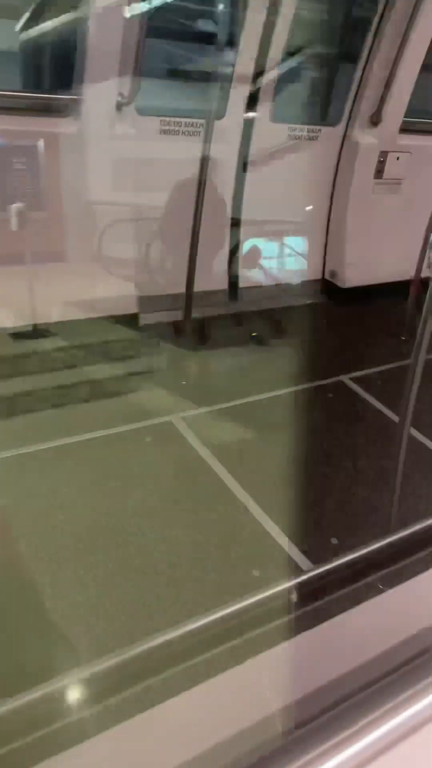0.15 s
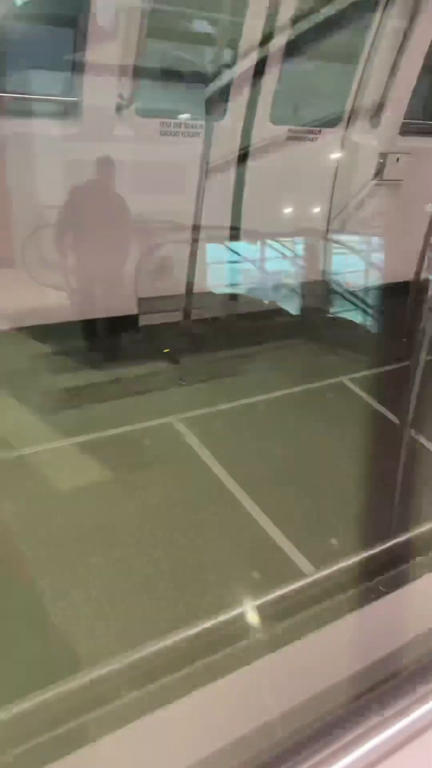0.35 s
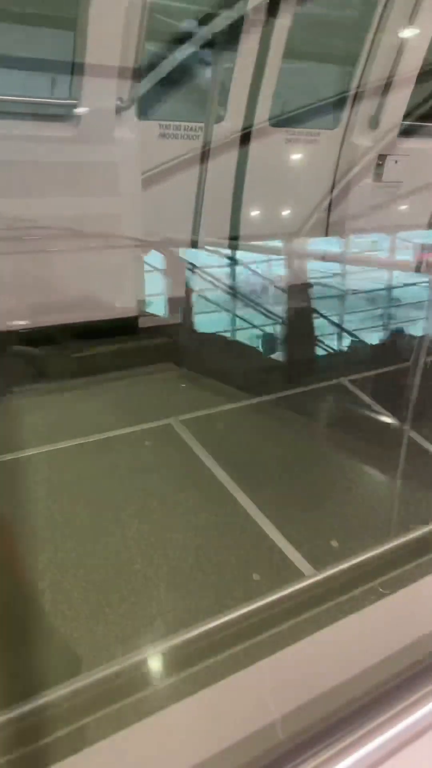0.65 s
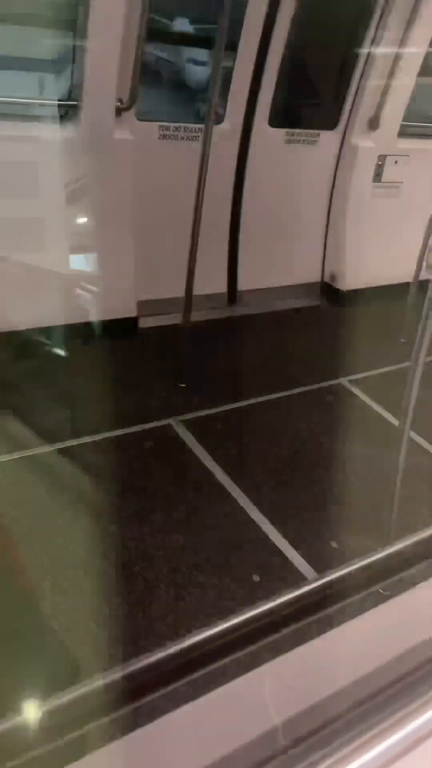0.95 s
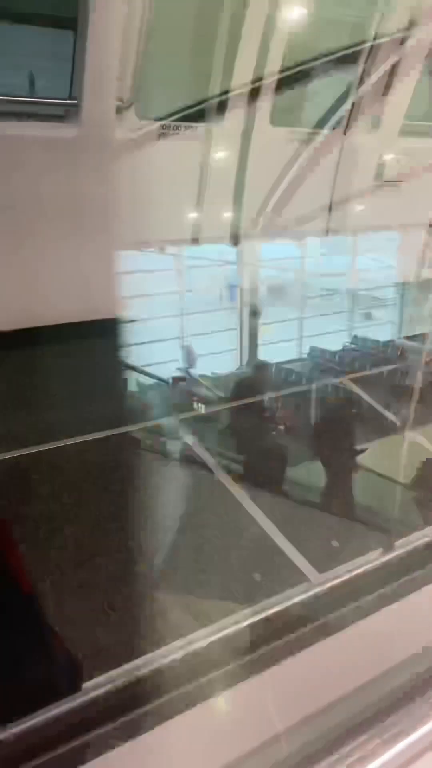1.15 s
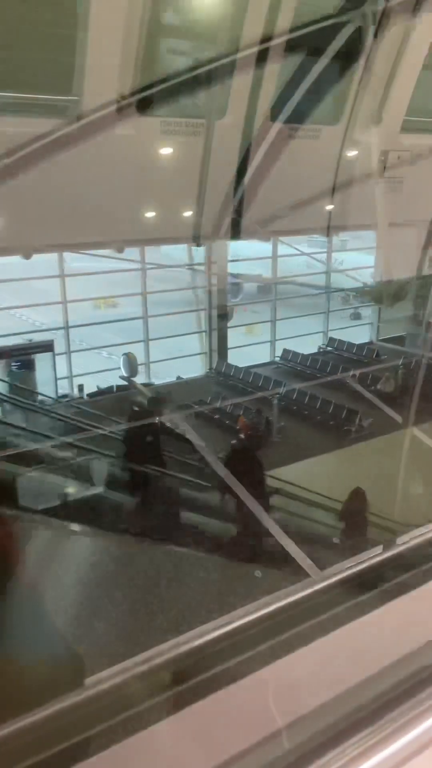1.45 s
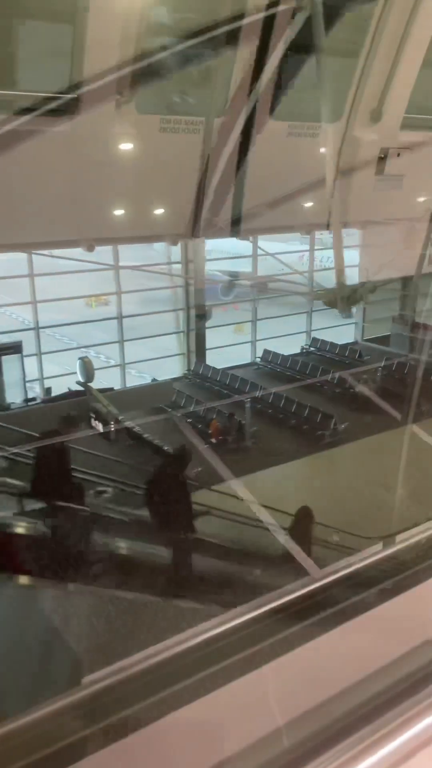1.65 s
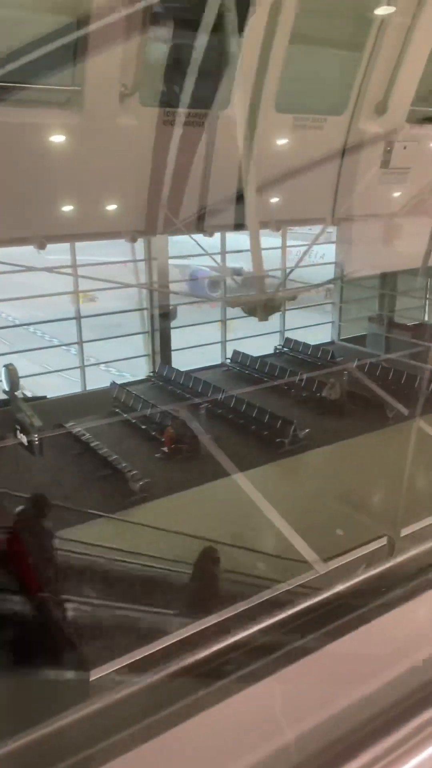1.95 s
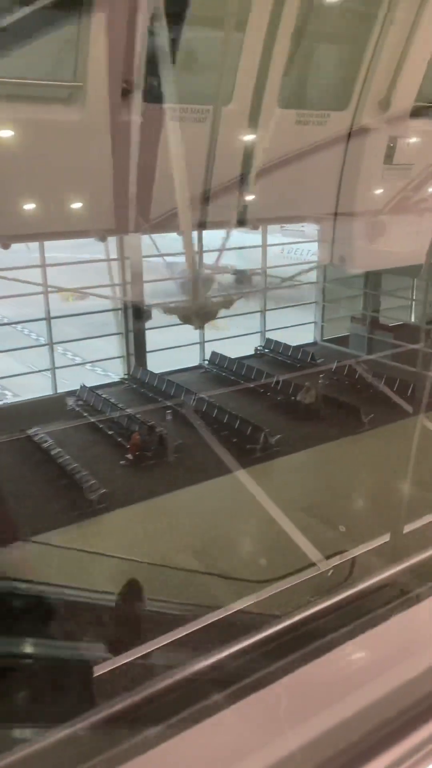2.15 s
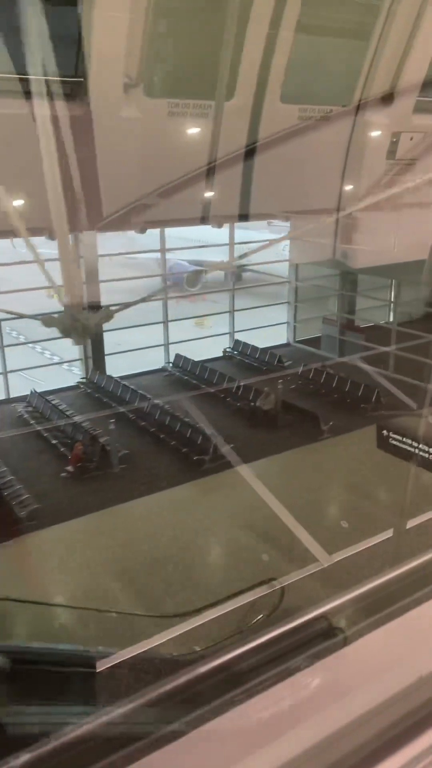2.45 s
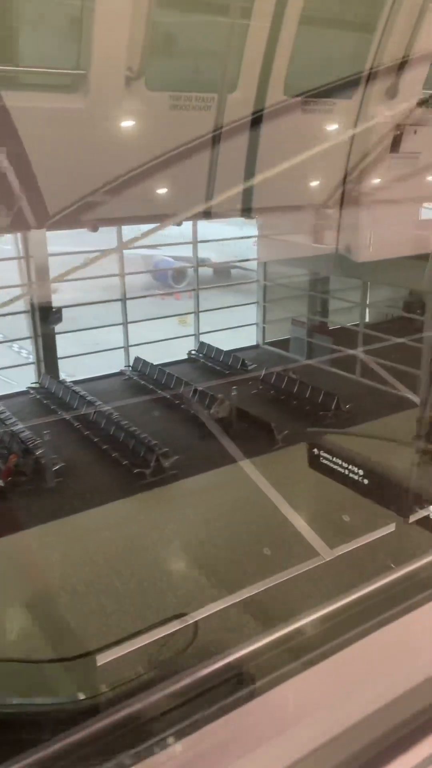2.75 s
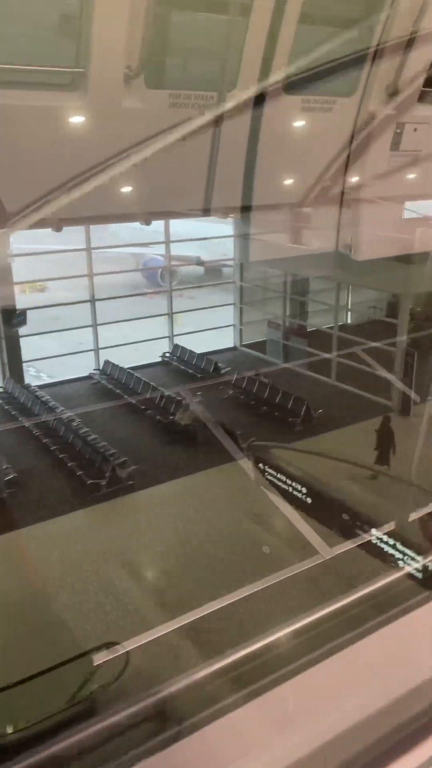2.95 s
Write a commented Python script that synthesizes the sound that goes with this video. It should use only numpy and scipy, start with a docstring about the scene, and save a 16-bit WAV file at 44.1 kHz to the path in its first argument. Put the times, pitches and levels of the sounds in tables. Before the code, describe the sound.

A people-mover tram hums and rumbles throughout, heard inside the car, its low drone swelling and sinking over rushing ride noise, a fan and a faint high whine. Thin hiss and fine crackle sit close on the left, with small scattered ticks from 0.2 to 2.4 seconds. A brief track swish comes at about 2.1 seconds, and the rumble lifts slightly near 2.9 seconds.

```python
"""Inside a people-mover tram at steady speed through a terminal hall, stereo microphone in the cabin.
From the start the drive hums through the car body, swelling and sinking, over a low rumble, shaken
panels, the rush of the ride, a ventilation fan and a faint electronic whine. Close by on the left
sit a thin hiss and a fine crackle, joined from 0.2 s by scattered small ticks. At 2.1 s comes one
brief swish along the track, and near the end the rumble lifts."""
import sys
import numpy as np
from scipy import signal
from scipy.io import wavfile
from scipy.ndimage import map_coordinates

SR = 44100
rng = np.random.default_rng(int(sys.argv[2]) if len(sys.argv) > 2 else 0)


def store_wav(level_fs):
    """Save 16-bit WAV to argv[1]."""
    pcm = np.round(np.clip(np.atleast_2d(level_fs), -1, 1) * 32767)
    wavfile.write(sys.argv[1], SR, pcm.T.astype(np.int16))


N = 136710
T = np.arange(N) / SR

# Swell of the drive hum's fundamental: time_s, level_db
HUM_LEVEL = [(0.03, -17.5), (0.21, -19), (0.39, -16.5), (0.48, -20.5), (0.74, -18.5), (0.86, -27),
             (0.89, -18.5), (0.93, -21), (0.97, -16), (1.13, -19), (1.29, -23), (1.32, -17.5),
             (1.43, -16.5), (1.57, -23.5), (1.62, -19.5), (1.78, -21), (1.81, -25.5), (1.97, -18.5),
             (2.11, -21), (2.13, -25.5), (2.33, -15), (2.56, -22), (2.65, -16), (2.84, -20.5), (2.94, -16),
             (3.06, -19.5)]
# Swell of its octave, before trim: time_s, level_db
OCTAVE_LEVEL = [(0.04, -34), (0.3, -34), (0.37, -38.5), (0.54, -32), (0.64, -42), (0.68, -36.5),
                (1.07, -31.5), (1.47, -37.5), (1.75, -31), (1.9, -41.5), (2.11, -36.5), (2.14, -28.5),
                (2.61, -32), (2.69, -44), (3.02, -30), (3.06, -30.5)]
# How alike cabin noise is on the two sides of the microphone: frequency_hz, likeness (1 = the same)
CABIN_LIKENESS = [(60, .9999), (110, .9995), (170, 1), (220, 0.98), (310, 0.98), (460, 0.74), (700, 0.42),
                  (1100, 0.2), (1600, 0.99), (2200, .7), (2800, 0.23), (4500, 0.038)]
# Colour of the car body's rumble: frequency_hz, relative_db
RUMBLE_SPECTRUM = [(30, -24), (40, -8), (70, -4), (100, 2), (150, -1), (220, -4.5), (310, -9), (440, -12),
                   (620, -18.5), (900, -28.5)]
# Course of the rumble, before trim: time_s, level_db
RUMBLE_LEVEL = [(0, -32.5), (1, -32.5), (1.9, -32), (2.4, -32), (2.75, -31), (2.9, -28), (3.1, -29.5)]
# Resonances of the cabin panels: pitch_hz, width_hz, level_db, likeness
PANEL_MODES = [(44.8, 7, -40.5, 0.94), (70.8, 18, -37.5, .9999), (185.6, 23, -41.5, 0.98),
               (283, 21, -44, 1), (367.5, 47, -48.5, 0.4), (485, 50, -52.5, .4), (661, 45, -52.5, 0.56),
               (2153, 170, -57.5, 0.88), (3950, 530, -76.5, .6)]
# Coming and going of the body's drone, before trim: time_s, level_db
DRONE_LEVEL = [(0.04, -38), (0.08, -43), (0.11, -34), (0.57, -39), (0.63, -30.5), (0.73, -49), (0.77, -31),
               (0.94, -41), (1.21, -32.5), (1.23, -45), (1.3, -33), (1.32, -48), (1.6, -38.5),
               (1.64, -28.5), (1.67, -50), (1.96, -41), (2.17, -57), (2.19, -39), (2.91, -41.5),
               (3.06, -38)]
# Colour of the ride's rush: frequency_hz, relative_db
RUSH_SPECTRUM = [(400, -6.5), (640, -1), (850, 0), (1200, 0.5), (1350, -7), (1600, -6.5), (1900, -14),
                 (2300, -11.5), (2800, -14.5), (3300, -19.5), (4000, -21), (4700, -29), (7000, -36)]
# Swells of the rush, before trim: time_s, level_db
RUSH_LEVEL = [(0, -46.5), (.25, -44), (.54, -44), (.64, -46.5), (.8, -43.5), (.9, -45.5), (1.36, -42),
              (1.46, -46), (1.78, -44.5), (2.0, -46), (2.15, -42.5), (2.33, -46.5), (2.62, -43),
              (2.82, -43), (2.9, -44.5), (3.1, -45.5)]
# Course of the electronic whine: time_s, level_db
WHINE_LEVEL = [(0, -70), (.8, -67), (1.0, -65), (1.3, -63), (1.65, -61), (1.85, -71.5), (3.1, -69)]
# Colour of the close hiss: frequency_hz, relative_db
HISS_SPECTRUM = [(2500, -15.5), (4000, -6), (4700, -10), (5300, 1.5), (6500, 1.5), (8000, 1.5), (10000, 4),
                 (11000, 1), (12200, -22)]
# Course of the hiss, before trim: time_s, level_db
HISS_LEVEL = [(0, -60.5), (.33, -57), (.56, -59.5), (.82, -56), (.93, -57.5), (1.2, -60.5), (1.38, -56.5),
              (1.48, -60.5), (1.55, -57), (1.95, -58.5), (2.08, -55.5), (2.25, -60.5), (2.72, -60.5),
              (2.85, -55.5), (3.1, -57)]
# Close ticks, before trim: start_s, level_db, t60_s, low_edge_hz, ring_relative_db
TICKS = [(.195, -38, .012, 5500, -22), (0.202, -36, 0.013, 6000, -20), (0.2126, -34.5, .022, 5500, -17),
         (.222, -35.5, 0.022, 5000, -17), (.232, -47, 0.03, 6000, -20), (.346, -41, 0.042, 4500, -14),
         (.3625, -32.5, 0.028, 3500, -1.5), (.882, -43, 0.013, 5000, -11), (1.384, -38, .012, 7000, -19),
         (1.4215, -34, 0.019, 7500, -25), (1.537, -43, .025, 7000, -25), (1.806, -41, 0.013, 5000, -11),
         (1.856, -42, .012, 5000, -18), (2.129, -50.5, .012, 4000, -0.5), (2.353, -38.5, 0.017, 8500, -24),
         (2.361, -38.5, .012, 8500, -26), (2.399, -30, 0.012, 5000, -19), (2.4345, -38, 0.018, 6500, -14)]
# Resonances of the ticking part: pitch_hz, width_hz, relative_db, t60_s
TICK_MODES = [(2180, 360, -4, .12), (2900, 690, -1.5, .06), (3810, 470, -0.5, 0.044)]
# Colour of the swish along the track: frequency_hz, relative_db
SWISH_SPECTRUM = [(800, -10.5), (1200, 2.5), (1700, -6), (2800, -4.5), (3400, -13.5), (4000, -18.5)]


def from_db(db):
    """Decibels to gain."""
    return 10 ** (np.asarray(db) / 20)


def unit_rms(x):
    """Scale to rms 1."""
    return x / np.sqrt(np.mean(x ** 2) + 1e-20)


def in_time(rows):
    """Join (time_s, value) points by straight lines."""
    return np.interp(T, *np.transpose(rows))


def at_hz(points, hz):
    """Read (frequency_hz, value) points on a log axis."""
    frequencies, values = np.transpose(points)
    return np.interp(np.log(hz), np.log(frequencies), values)


def drift(rate_hz):
    """Slow random motion of spread 1."""
    step = 40  # samples between points
    pole = np.exp(-2 * np.pi * rate_hz * step / SR)
    slow = signal.lfilter([1], [1, -2 * pole, pole * pole], rng.standard_normal(N // step + 2002))[2000:]
    return np.interp(np.arange(N) / step, np.arange(len(slow)), unit_rms(slow))


def pan(db):
    """Left and right gains; positive leans left."""
    return from_db(db * np.array([[1], [-1]]))


def stereo(pair, likeness):
    """Mix two unrelated noises as mid and side, for a likeness from -1 to 1."""
    return np.sqrt(1 + likeness) * pair[0] + np.sqrt(1 - likeness) * pair[1] * np.array([[1], [-1]])


def from_left(pair, lag_s=0.0001663):
    """A source on the left reaches the microphone's right side a little later."""
    return np.array([pair[0], map_coordinates(pair[1], [np.arange(N) - lag_s * SR], order=3)])


def banded_noise(spectrum, likeness, flicker_db, flicker_hz):
    """Narrow bands of stereo noise, each flickering on its own; rms 1."""
    edges = np.concatenate([np.geomspace(22, 880, 16, endpoint=False), np.geomspace(880, 14080, 25)])
    white, out = rng.standard_normal((2, 2, N + SR // 2)), 0
    for k, (low, high) in enumerate(zip(edges, edges[1:])):
        hz, flicker = np.sqrt(low * high), flicker_db * drift(flicker_hz)
        if high > spectrum[0][0] and low < spectrum[-1][0]:
            band = signal.butter(2, [low, high], "band", fs=SR, output="sos")
            pair = signal.sosfilt(band, white[k % 2])[:, -N:]
            out = out + from_db(at_hz(spectrum, hz) + flicker) * stereo(pair, at_hz(likeness, hz))
    return unit_rms(out)


def resonance(hz, width_hz, likeness):
    """Stereo noise ringing in one resonance; rms 1."""
    band = signal.butter(2, [hz - width_hz / 2, hz + width_hz / 2], "band", fs=SR, output="sos")
    pair = signal.sosfilt(band, rng.standard_normal((2, N + SR)))[:, -N:]
    return unit_rms(stereo(pair, likeness))


def bright_noise(edge_hz):
    """High-passed noise; rms 1."""
    highpass = signal.butter(2, edge_hz, "high", fs=SR, output="sos")
    return unit_rms(signal.sosfilt(highpass, rng.standard_normal(N)))


def tone(hz, db, lead_rad, wander_hz):
    """A wandering sine that reaches the left side first."""
    phase = 2 * np.pi * np.cumsum(hz + wander_hz * drift(10.3)) / SR
    return np.sqrt(2) * from_db(db) * np.array([np.sin(phase), np.sin(phase - lead_rad)])


def drive_hum(pitch_hz=121.48, wander_hz=0.604, octave_trim_db=-0.5):
    """The drive hums through the car body in three fluttering harmonics, almost dead centre."""
    phase = 2 * np.pi * np.cumsum(pitch_hz + wander_hz * drift(6.01)) / SR
    phase = phase - np.array([[0], [0.02]])  # the right side lags a touch
    levels_db = [in_time(HUM_LEVEL) + 0.6 * drift(7.8),
                 in_time(OCTAVE_LEVEL) + octave_trim_db + 1.5 * drift(9.1),
                 -49 + 3.5 * drift(10.7)]
    hum = sum(np.sqrt(2) * from_db(db) * np.sin(harmonic * phase + rng.uniform(0, 2 * np.pi))
              for harmonic, db in enumerate(levels_db, start=1))
    return pan(-0.08) * hum


def body_rumble(trim_db=1.5):
    """The ride shakes the car body into a broad, low rumble."""
    noise = banded_noise(RUMBLE_SPECTRUM, CABIN_LIKENESS, flicker_db=1, flicker_hz=10)
    return from_db(in_time(RUMBLE_LEVEL) + trim_db) * noise


def panel_ring():
    """Panels around the microphone, shaken by the ride, ring at their resonances."""
    return sum(from_db(db) * resonance(hz, width_hz, likeness) for hz, width_hz, db, likeness in PANEL_MODES)


def body_drone(trim_db=-3.5):
    """The shaken body drones on and off at an unsteady pitch, louder on the right."""
    return pan(-3) * tone(hz=365, db=in_time(DRONE_LEVEL) + trim_db, lead_rad=0.5, wander_hz=9)


def ride_rush(trim_db=4):
    """Running noise fills the cabin and swells now and then along the track."""
    noise = banded_noise(RUSH_SPECTRUM, CABIN_LIKENESS, flicker_db=1.68, flicker_hz=7.6)
    return from_db(in_time(RUSH_LEVEL) + trim_db) * noise


def fan():
    """The ventilation fan holds one lightly fluttering note."""
    return tone(hz=382.4, db=-42.5 + 0.5 * drift(5.8), lead_rad=0.5, wander_hz=0.95)


def electronic_whine():
    """The electronics give off a faint, high, fluttering tone."""
    return tone(hz=5000, db=in_time(WHINE_LEVEL) + 2 * drift(5), lead_rad=2.27, wander_hz=1.5)


def hiss(trim_db=2):
    """Thin hiss close on the left, with one narrow band in opposite phase on the two sides."""
    broad = from_left(banded_noise(HISS_SPECTRUM, likeness=[(5000, 1)], flicker_db=1.3, flicker_hz=25))
    narrow = from_db(-12) * resonance(hz=5200, width_hz=720, likeness=-1)
    return from_db(in_time(HISS_LEVEL) + trim_db) * (broad + narrow)


def crackle(per_s=38, level_db=-58, spread_db=0.5, t60_s=0.0057):
    """Tiny bright clicks at random moments, close on the left."""
    onsets = rng.random(N) < per_s / SR
    strengths = from_db(level_db + spread_db * np.minimum(rng.exponential(1, N), 3))
    decay = from_db(-60 / (t60_s * SR))
    envelope = signal.lfilter([1], [1, -decay], onsets * strengths + 1e-18)
    clicks = envelope * bright_noise(edge_hz=6500)
    return from_left([clicks, clicks])


def ticks(trim_db=1, attack_s=0.0018, tail_db=-15, tail_t60_s=0.29):
    """A small part ticks close on the left: a bright burst, a brief rough ring and a faint tail."""
    modes = [(resonance(hz, width_hz, likeness=1)[0], db, t60) for hz, width_hz, db, t60 in TICK_MODES]
    out = 0
    for start_s, level_db, t60_s, edge_hz, ring_db in TICKS:
        age = np.maximum(T - start_s, 0)
        attack = np.minimum(age / attack_s, 1)
        decay = from_db(-60 * age / t60_s) + from_db(tail_db - 60 * age / tail_t60_s)
        burst = decay * bright_noise(edge_hz)
        ring = sum(from_db(ring_db + db - 60 * age / t60) * mode for mode, db, t60 in modes)
        out = out + from_db(level_db + trim_db) * attack * (burst + ring)
    return from_left([out, out])


def track_swish(peak_s=2.088, peak_db=-42, spread_s=0.04):
    """One short, brighter rush along the track rises and falls."""
    swell = from_db(peak_db) * np.exp(-0.5 * ((T - peak_s) / spread_s) ** 2)
    return swell * banded_noise(SWISH_SPECTRUM, CABIN_LIKENESS, flicker_db=3, flicker_hz=30)


def scene():
    """Everything that reaches the microphone in the cabin."""
    car_body = drive_hum() + body_rumble() + panel_ring() + body_drone()
    cabin = car_body + ride_rush() + fan() + electronic_whine()
    close_left = hiss() + crackle() + ticks()
    return cabin + close_left + track_swish()


def record(dry, fade_s=0.004, low_cut_hz=33, stopband_hz=12400):
    """The ends fade quickly, the deepest bass is rolled off and the top is cut steeply."""
    fade = np.minimum(np.minimum(T, T[::-1]) / fade_s, 1)
    low_cut = signal.butter(4, low_cut_hz, "high", fs=SR, output="sos")
    high_cut = signal.cheby2(16, 70, stopband_hz, fs=SR, output="sos")
    return signal.sosfilt(high_cut, signal.sosfilt(low_cut, dry * fade))


dry = scene()
out = record(dry)
store_wav(out)
```